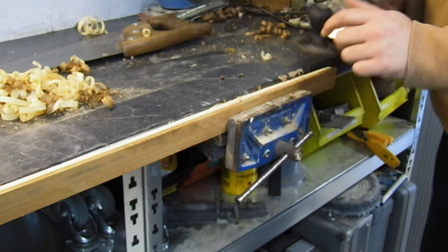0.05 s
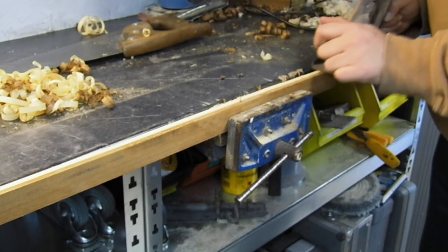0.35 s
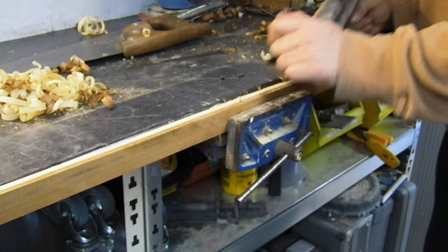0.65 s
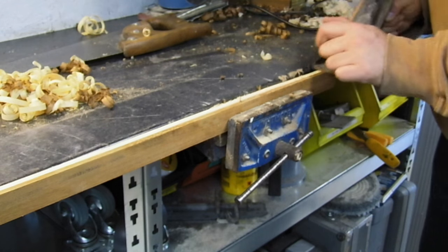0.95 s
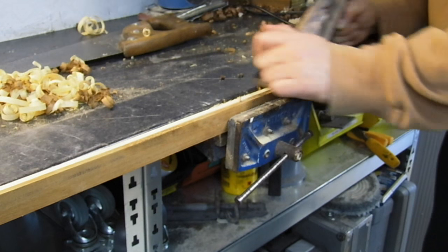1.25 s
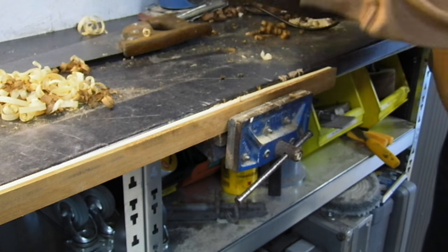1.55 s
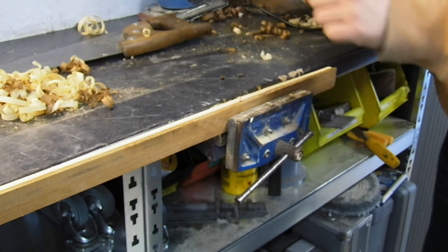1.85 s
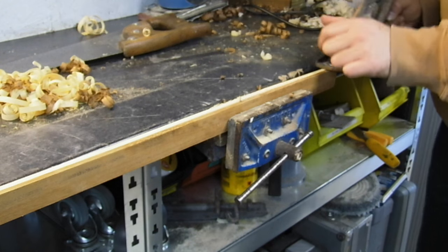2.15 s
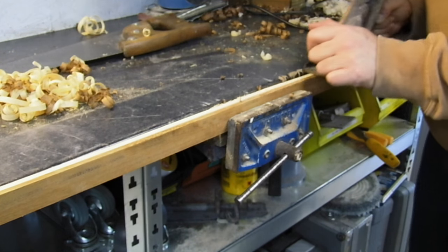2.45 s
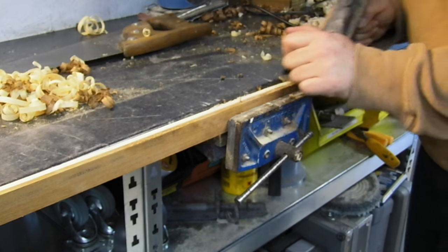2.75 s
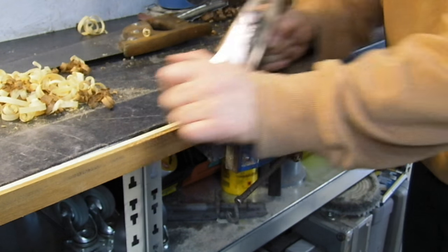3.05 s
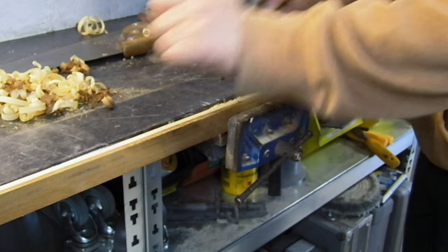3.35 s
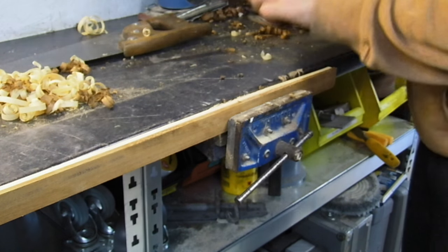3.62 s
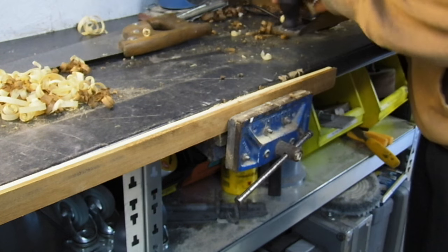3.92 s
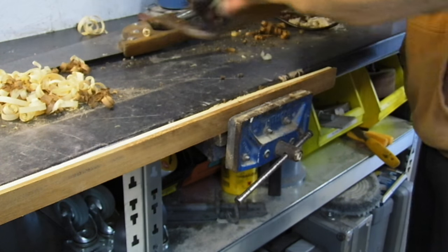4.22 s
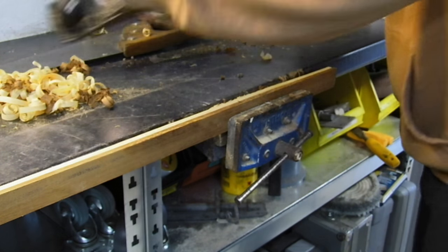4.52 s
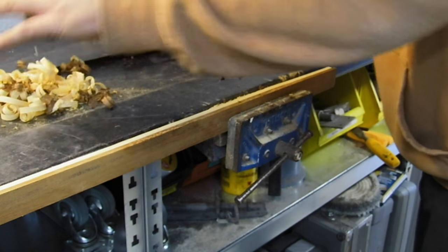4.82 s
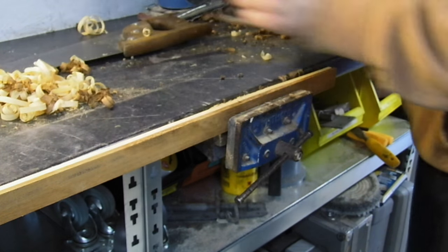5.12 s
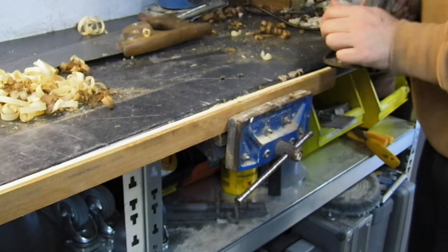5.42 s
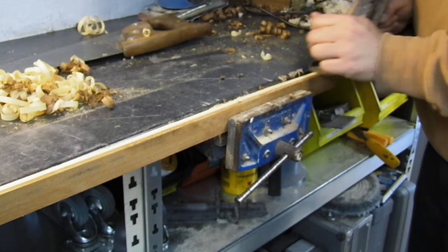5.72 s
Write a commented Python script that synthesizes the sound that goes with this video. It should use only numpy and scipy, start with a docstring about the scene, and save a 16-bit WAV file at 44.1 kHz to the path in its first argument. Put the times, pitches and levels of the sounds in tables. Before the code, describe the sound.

In a small workshop with a faint room rumble, a hand plane works the edge of a board close by. Each stroke opens with a clack and a dull bench thud, followed by a slight squeak and the rasp of tearing wood fibres. After two brief cuts and a light rustle comes a longer cut. Dry shavings crackle quietly between fingers during a pause, then the plane lands and cuts once more.

```python
"""A steel hand plane works the edge of a board in a bench vise; a small workshop, mono.
Over a faint room rumble the sole knocks down on the board, then slides with a thin squeal.
The iron bites: tearing fibres hiss and shake iron, plane and board, the shaving rings lower
as it grows, and stick-slip judders the bench. Between strokes fingers pull the shaving from
the plane with a dry rustle. Four strokes; the third runs into one long, slow cut."""
import sys
import numpy as np
from scipy import signal
from scipy.fft import rfft, irfft
from scipy.io import wavfile
from scipy.ndimage import uniform_filter1d

SR = 44100
rng = np.random.default_rng(int(sys.argv[2]) if len(sys.argv) > 2 else 0)


def wav_record(signal):
    """Record a signal, one row per channel, as 16-bit PCM in the file named by sys.argv[1]."""
    frames = np.transpose(np.atleast_2d(signal))
    bounded = np.clip(frames, -1, 1)
    # unit amplitude maps onto the largest positive 16-bit level
    quanta = np.round(bounded * 32767).astype(np.int16)
    wavfile.write(sys.argv[1], SR, quanta)


N = 254898
TIME = np.arange(N) / SR
USUAL_FORCE_DB, USUAL_FIZZ_DB = -49, -63.5   # levels at which force and fizz drive are 1


def from_db(db):
    """Decibels to gain."""
    return 10 ** (np.asarray(db) / 20)


def unit_rms(x):
    """Scale to rms 1."""
    return x / np.sqrt(np.mean(x ** 2) + 1e-20)


def evened(x, window_s):
    """Hold the running rms at 1, as a steady push does."""
    return x / np.sqrt(np.maximum(uniform_filter1d(x ** 2, int(window_s * SR)), 1e-20))


def coloured(x, spectrum):
    """Shape a steady signal by (freq_hz, level_db) points; rms 1."""
    hz, db = np.transpose(spectrum)
    bins_hz = np.maximum(np.arange(N // 2 + 1) * SR / N, 1)
    gain = from_db(np.interp(np.log(bins_hz), np.log(hz), db))
    return unit_rms(irfft(rfft(x) * gain, N))


def drift(rate_hz):
    """Random wander, rate_hz knots a second; rms 1."""
    knots = rng.standard_normal(N // 8)
    return unit_rms(np.interp(TIME * rate_hz, np.arange(len(knots)), knots))


def low_pass(x, hz, order):
    """Causal Butterworth low-pass."""
    return signal.sosfilt(signal.butter(order, min(hz, .45 * SR), fs=SR, output="sos"), x + 1e-18)


def resonate(x, hz, width_hz):
    """Resonance with peak gain 1."""
    r, w = np.exp(-np.pi * width_hz / SR), 2 * np.pi * hz / SR
    return signal.lfilter(np.array([1, 0, -1]) * (1 - r * r) / 2, [1, -2 * r * np.cos(w), r * r], x)


def resonator_bank(x, modes):
    """Parallel resonances of alternating sign; rms 1."""
    return unit_rms(sum((-1) ** k * from_db(db) * resonate(x, hz, width_hz)
                        for k, (hz, width_hz, db) in enumerate(modes)))


def ring(x, hz, t60_s):
    """Mode that a unit click rings at height 1."""
    r, w = np.exp(-np.log(1000) / (t60_s * SR)), 2 * np.pi * hz / SR
    return signal.lfilter([0, np.sin(w)], [1, -2 * r * np.cos(w), r * r], x + 1e-18)


def swell(start_s, end_s, rise_s, t60_s):
    """Envelope: rise up to start_s, hold to end_s, decay."""
    out = np.zeros(N)
    near = (TIME > start_s - 4 * rise_s) & (TIME < end_s + 2 * t60_s)
    attack = (np.minimum(TIME[near] - start_s, 0) / rise_s) ** 2
    decay = np.log(1000) * np.maximum(TIME[near] - end_s, 0) / t60_s
    out[near] = np.exp(-attack - decay)
    return out


def fractures(per_s=9000, spread_db=0.5, clump_db=1.0, clump_hz=450):
    """Wood fibres snap: uneven random clicks in clumps; rms 1."""
    sizes = from_db(spread_db * np.minimum(rng.exponential(1, N), 4) + clump_db * drift(clump_hz))
    return unit_rms(sizes * rng.choice([-1, 1], N) * (rng.random(N) < per_s / SR))


# room noise spectrum: freq_hz, level_db
RUMBLE_SPECTRUM = [(11, -29.5), (18, 0.5), (70, -5.5), (90, -15), (163, -28.5), (199, -25), (304, -31),
                   (371, -29.5), (711, -29.5), (891, -28), (1910, -43.5), (3770, -48.5), (5440, -49.5),
                   (13800, -55.5), (15500, -70)]


def room_rumble(level_db=-61):
    """Faint, steady low noise of the room."""
    return from_db(level_db) * coloured(rng.standard_normal(N), RUMBLE_SPECTRUM)


# sole landings: start_s, thud_db, clack_db, clack_top_hz, ping_db
KNOCKS = [(0.178, -38, -49.5, 3100, -46.5), (0.825, -49.5, -44, 3180, -41.5),
          (0.827, -36.5, -50, 5300, -46.5), (2.102, -36, -53.5, 2150, -56.5),
          (5.536, -36, -54.5, 2440, -53), (5.558, -40, -47, 1345, -58)]
# clack spectrum: freq_hz, level_db
CLACK_SPECTRUM = [(90, -8), (300, 13.5), (600, 4), (800, 1), (1200, -2.5), (1650, 3.5), (2400, -1),
                  (3150, 0), (3900, -6.5), (5000, -4.5), (9000, -9.5)]


def sole_clack(rattle_db=0.5, tick_db=-58.5, ping_ratio=0.897, ping_width_hz=700):
    """The landing plane clacks; close modes of the steel sole ping just below the clack's top."""
    dense_modes = evened(coloured(rng.standard_normal(N), CLACK_SPECTRUM), window_s=0.018)
    out = np.zeros(N)
    for start_s, _, clack_db, top_hz, ping_db in KNOCKS:
        crack = swell(start_s, start_s, rise_s=0.0002, t60_s=0.038) * dense_modes
        rattle = from_db(rattle_db) * swell(start_s, start_s, rise_s=0.0014, t60_s=0.23) * dense_modes
        clack = from_db(clack_db) * low_pass(crack + rattle, top_hz, order=16)
        tick = from_db(tick_db) * low_pass(crack, hz=9000, order=1)
        ping_hz = ping_ratio * top_hz
        cluster = resonate(resonate(dense_modes, ping_hz, ping_width_hz), ping_hz, ping_width_hz)
        ping = swell(start_s, start_s, rise_s=0.0016, t60_s=0.014) * evened(cluster, window_s=0.015)
        out += clack + tick + from_db(ping_db) * ping
    return out


# modes of board, vise and bench: freq_hz, t60_s, struck_db, dragged_db
BENCH_MODES = [(65.2, 0.26, -34, -3.5), (96, 0.13, 2, 0), (126.4, 0.2, 3, -0.5), (150.3, 0.33, -16, -1.5),
               (219.6, 0.16, 2, -1.5), (256.2, 0.15, -4, -2.5), (314.5, 0.2, -14.5, 1), (454, 0.16, -8, -3),
               (523.5, 0.059, -14, -3), (562, 0.2, -10.5, -2.5), (654.5, 0.13, -22.5, -6.5)]


def bench_thud(lag_s=0.00298, usual_cutoff_hz=360, usual_clack_db=-50, db_per_octave=1.5, vary_db=1.0):
    """Each landing rings the heavy bench, brighter under a harder blow."""
    blows = []
    for start_s, thud_db, clack_db, _, _ in KNOCKS:
        push = from_db(thud_db) * signal.unit_impulse(N, int((start_s + lag_s) * SR))
        cutoff_hz = usual_cutoff_hz * 2 ** ((clack_db - usual_clack_db) / db_per_octave)
        blows.append(low_pass(push, cutoff_hz, order=1))
    # each blow lands on another spot and weights the modes differently
    shares = from_db(vary_db * rng.standard_normal((len(KNOCKS), len(BENCH_MODES))))
    mode_forces = shares.T @ np.array(blows)
    return -sum((-1) ** (k // 3) * from_db(db) * ring(mode_forces[k], hz, t60_s)
                for k, (hz, t60_s, db, _) in enumerate(BENCH_MODES))


# slides before the bite: start_s, end_s, level_db
SLIDES = [(0.226, 0.383, -67), (0.849, 0.974, -65.5), (2.131, 2.203, -68), (2.287, 2.408, -65),
          (5.562, 5.73, -65)]
# rubbing spectrum: freq_hz, level_db
RUB_SPECTRUM = [(150, 19), (400, 21.5), (1500, 6), (2500, 3), (4700, 4.5), (7800, -1), (9200, -2),
                (12000, -6), (16000, -17)]
# friction resonances of the sole: freq_hz, width_hz, level_db
SQUEAL_MODES = [(4560, 100, 1.5), (4960, 66, 0), (6080, 160, 6.5), (8130, 200, 0), (8400, 70, 16),
                (8710, 82, 4), (9100, 74, -25)]


def sole_slide(force, squeal_drive, pressed_db=-57.0, free_squeal_db=-10.5, gather_db=8.0):
    """The sole rubs the grain, harder in a cut; its thin squeal grows as it gathers speed."""
    rub = coloured(rng.standard_normal(N), RUB_SPECTRUM)
    squeal = evened(resonator_bank(rng.standard_normal(N), SQUEAL_MODES), window_s=0.042)
    flutter = unit_rms(from_db(2.5 * drift(rate_hz=60)))
    rub_drive = from_db(pressed_db) * force
    for start_s, end_s, db in SLIDES:
        contact = from_db(db) * swell(start_s, end_s, rise_s=0.029, t60_s=0.14)
        speed_db = np.interp(TIME, [start_s, end_s], [-gather_db, 0])
        rub_drive = rub_drive + contact
        squeal_drive = squeal_drive + contact * from_db(free_squeal_db + speed_db)
    return rub_drive * rub + squeal_drive * flutter * squeal


# short cuts: bite_s, peak_s, end_s, force_db, sag_db_per_s, fizz_rel_db, singing_rel_db, squeal_rel_db
SHORT_CUTS = [(0.368, 0.44, 0.5, -44, 140, -4.5, -2.5, -20), (0.966, 0.956, 1.225, -47.5, 43, 1, -0.5, -11),
              (2.265, 2.288, 2.243, -59, 148, -3, 4, -26), (2.422, 2.446, 2.46, -54.5, 103, 1.5, -2, -4.5),
              (5.711, 5.715, 5.74, -47.5, -1, 2, -4.5, -13.5)]
# course of the slow cut: time_s, force_db, fizz_db
LONG_CUT = [(2.52, -86, -93), (2.546, -65, -69), (2.626, -52.5, -62), (2.742, -49.5, -71),
            (2.82, -56.5, -66), (2.886, -55, -62), (2.912, -51.5, -64.5), (3.004, -53, -60.5),
            (3.056, -51, -63), (3.116, -58.5, -68.5), (3.19, -88, -98)]


def cut_drives(rise_s=0.0041, build_db_per_s=34, long_singing_db=1.5,
               fizz_power=0.96, singing_power=1.48):
    """Force on the iron builds, sags and lets go; returns it with the fizz, singing and squeal drives."""
    times_s, force_db, fizz_db = np.transpose(LONG_CUT)
    in_wood = swell(times_s[0], times_s[-1], rise_s, t60_s=0.087)
    force = in_wood * from_db(np.interp(TIME, times_s, force_db) - USUAL_FORCE_DB)
    fizz = in_wood * from_db(np.interp(TIME, times_s, fizz_db) - USUAL_FIZZ_DB)
    singing = from_db(long_singing_db) * force ** singing_power
    squeal = np.zeros(N)
    for bite_s, peak_s, end_s, db, sag_db_per_s, fizz_rel_db, sing_rel_db, squeal_rel_db in SHORT_CUTS:
        # a peak outside bite_s..end_s turns that slope into a constant boost
        build_db = build_db_per_s * np.clip(peak_s - TIME, 0, peak_s - bite_s)
        sag_db = sag_db_per_s * np.clip(TIME - peak_s, 0, end_s - peak_s)
        push = from_db(db - USUAL_FORCE_DB - build_db - sag_db) * swell(bite_s, end_s, rise_s, t60_s=0.19)
        force += push
        fizz += from_db(fizz_rel_db) * push ** fizz_power
        singing += from_db(sing_rel_db) * push ** singing_power
        squeal += from_db(USUAL_FORCE_DB + squeal_rel_db) * push
    return force, fizz, singing, squeal


# tearing spectrum: freq_hz, level_db
TEAR_SPECTRUM = [(1200, -35), (2400, -6.5), (3200, 4.5), (5500, 3.5), (7000, -4.5), (9000, 3.5),
                 (10000, -8), (12000, -16), (16000, -41)]
# treble fizz spectrum: freq_hz, level_db
FIZZ_SPECTRUM = [(6000, -44), (9000, -10), (10200, -3), (11800, -1.5), (13300, -6.5), (16000, -6)]
# upper resonances of iron and cap: freq_hz, width_hz, level_db
IRON_MODES = [(2504, 84, -3.5), (2900, 180, 2), (3098, 26, 8), (3680, 41, 9.5), (4060, 39, 2),
              (4420, 29, 1), (4650, 32, 11), (4960, 88, 5), (5520, 120, -12), (5720, 63, 8), (6740, 160, 6),
              (7870, 510, 2), (8910, 200, -1.5), (11030, 170, -6)]


def fibre_tear(fibres, force, fizz_drive, hiss_db=-58.0, iron_db=-57.5, fizz_db=-63.5, force_power=0.89):
    """Fibres giving way at the edge hiss, fizz and ring the iron."""
    hiss = from_db(hiss_db) * coloured(fibres, TEAR_SPECTRUM)
    iron = from_db(iron_db) * resonator_bank(fractures(), IRON_MODES)
    fizz = from_db(fizz_db) * coloured(fibres, FIZZ_SPECTRUM)
    return force ** force_power * (hiss + iron) + fizz_drive * fizz


# plane body resonances: freq_hz, width_hz, level_db
PLANE_MODES = [(822, 194, -2.5), (929, 38, 6.5), (1035, 110, -3.5), (1220, 72, -4), (1440, 43, 0.5),
               (1470, 230, -14.5), (1790, 58, -8), (2164, 54, -5)]


def plane_rasp(fibres, force, body_db=-56.0, grit_db=-62.0, lag_s=0.012, load_power=0.94):
    """Jerks of the fibres shake the heavy plane body, which takes up the force with a lag."""
    body = from_db(body_db) * resonator_bank(fractures(), PLANE_MODES)
    grit = from_db(grit_db) * unit_rms(resonate(fibres, hz=1070, width_hz=1100))
    pole = np.exp(-1 / (lag_s * SR))
    lagged_force = signal.lfilter([1 - pole], [1, -pole], force + 1e-18)
    return np.minimum(force, lagged_force) ** load_power * (body + grit)


def iron_singing(drive, level_db=-55.5):
    """Snapping fibres keep one mode of the iron singing."""
    mode = resonate(fractures(), hz=1757, width_hz=84)
    return from_db(level_db) * drive * evened(mode, window_s=0.068)


# stick-slip bursts: start_s, end_s, level_db, rate_hz
JUDDERS = [(0.454, 0.472, -48.5, 222), (0.999, 1.136, -53, 327), (2.365, 2.367, -57.5, 225),
           (2.44, 2.464, -47, 214), (2.627, 2.692, -49.5, 260), (2.954, 2.97, -45.5, 262),
           (5.758, 5.78, -41, 222)]


def board_drum(fibres, force, drag_db=-52.5, drag_power=0.49, judder_db=13.5, width_oct=0.57,
               wander_db=2.0):
    """The dragged board drums; stick-slip swells it, most in the modes near the judder rate."""
    bursts = [from_db(db) * swell(start_s, end_s, rise_s=0.013, t60_s=0.13)
              for start_s, end_s, db, _ in JUDDERS]
    envelope = from_db(drag_db) * force ** drag_power + sum(bursts)
    drum = np.zeros(N)
    for k, (hz, t60_s, _, db) in enumerate(BENCH_MODES):
        near_judder = sum(burst * np.exp(-(np.log2(hz / rate_hz) / width_oct) ** 2)
                          for burst, (*_, rate_hz) in zip(bursts, JUDDERS))
        mode_db = db + judder_db * near_judder / (envelope + 1e-12) + wander_db * drift(rate_hz=14)
        drum += (-1) ** k * ring(fibres * from_db(mode_db), hz, t60_s)
    return envelope * evened(drum, window_s=0.03)


# growing shavings: start_s, end_s, level_db, time_constant_s
CURLS = [(0.386, 0.463, -53.5, 0.043), (0.978, 1.204, -59, 0.11), (2.606, 2.98, -59, 0.067)]


def shaving_curl(first_hz=5420, last_hz=2743, half_width_hz=380, fade_db=5.5):
    """Shaken by the cut, the lengthening shaving is a broad resonance that sinks and fades."""
    shake = evened(low_pass(rng.standard_normal(N), half_width_hz, order=2), window_s=0.034)
    out = np.zeros(N)
    for start_s, end_s, db, time_constant_s in CURLS:
        grown = 1 - np.exp(-np.maximum(TIME - start_s, 0) / time_constant_s)
        cycles = np.cumsum(first_hz + (last_hz - first_hz) * grown) / SR
        envelope = from_db(db - fade_db * grown) * swell(start_s, end_s, rise_s=0.0018, t60_s=0.06)
        out += envelope * np.sqrt(2) * np.sin(2 * np.pi * cycles)
    return shake * out


# tugs at the shaving: peak_s, level_db, rise_s, t60_s, pitch_hz
TUGS = [(1.604, -74, 0.0028, 0.038, 7130), (1.732, -76.5, .0026, 0.24, 7500),
        (1.866, -72, 0.004, 0.078, 6840), (3.503, -75.5, 0.0063, .24, 3400),
        (3.907, -60.5, .0015, 0.072, 3500), (4.162, -61, 0.013, 0.16, 2530),
        (4.281, -63, 0.0037, 0.21, 4260), (4.374, -60, 0.0016, 0.065, 4060)]
# fingers working at the curl: start_s, end_s, level_db
FUMBLES = [(3.65, 3.85, -86), (3.957, 4.156, -81.5), (4.57, 4.63, -82.5)]
# dry shaving spectrum: freq_hz, level_db
CRACKLE_SPECTRUM = [(760, -50), (1300, -23), (1490, -1), (1770, -8), (2370, 0.5), (3070, -0.5), (3520, -1),
                    (10100, 2.5), (15500, -9.5)]


def shaving_rustle(pitched_db=-5.5, width_hz=1100):
    """The dry curl crackles as fingers draw it out, each fold at its own pitch, faintly in between."""
    folds = fractures(per_s=7100, spread_db=2.5, clump_db=6.0, clump_hz=260)
    crackle = coloured(fractures(per_s=5900, spread_db=0.5, clump_db=2.0, clump_hz=200), CRACKLE_SPECTRUM)
    tugs = np.zeros(N)
    for peak_s, db, rise_s, t60_s, pitch_hz in TUGS:
        pitched = from_db(pitched_db) * unit_rms(resonate(folds, pitch_hz, width_hz))
        envelope = from_db(db) * swell(peak_s, peak_s, rise_s, t60_s)
        tugs += envelope * evened(crackle + pitched, window_s=0.042)
    fumbling = sum(from_db(db) * swell(start_s, end_s, rise_s=0.032, t60_s=0.99)
                   for start_s, end_s, db in FUMBLES)
    flutter = from_db(2.5 * drift(rate_hz=110))
    return tugs + fumbling * unit_rms(flutter * crackle)


def workshop_reverb(x, low_t60_s=0.31, high_t60_s=0.14, low_db=-4.5, high_db=-6.0, shift_hz=2.2):
    """A cluttered room scatters a short tail, longer in the lows, that shifts as the plane travels."""
    t = TIME[:SR // 2]
    white = rng.standard_normal((2, len(t))) * (t > .004)
    lows = low_pass(white, hz=1500, order=1)
    tails = 0
    for band, t60_s, db in ((lows, low_t60_s, low_db), (white - lows, high_t60_s, high_db)):
        decay = np.exp(-np.log(1000) * t / t60_s)
        tails = tails + from_db(db) * band * decay / np.linalg.norm(decay)
    here, there = (signal.fftconvolve(x, tail)[:N] for tail in tails)
    blend_rad = 2 * np.pi * shift_hz * TIME + drift(shift_hz)
    return x + np.cos(blend_rad) * here + np.sin(blend_rad) * there


def scene():
    """Plane, bench and shaving in the room, over its rumble; two equal channels."""
    force, fizz_drive, singing_drive, squeal_drive = cut_drives()
    fibres = fractures()
    cut = fibre_tear(fibres, force, fizz_drive) + plane_rasp(fibres, force)
    cut += iron_singing(singing_drive) + board_drum(fibres, force) + shaving_curl()
    handling = sole_slide(force, squeal_drive) + sole_clack() + bench_thud() + shaving_rustle()
    return np.tile(workshop_reverb(cut + handling) + room_rumble(), (2, 1))


def record(dry):
    """Steep low-pass at 15750 Hz."""
    return signal.sosfilt(signal.ellip(12, .1, 100, 15750, fs=SR, output="sos"), dry)


dry = scene()
out = record(dry)
wav_record(out)
```